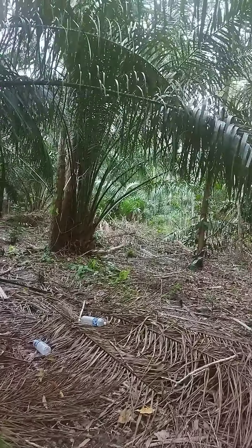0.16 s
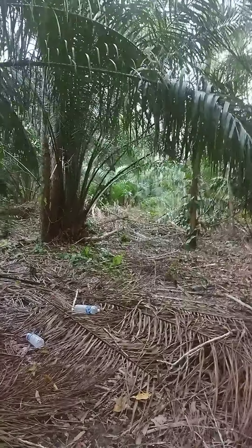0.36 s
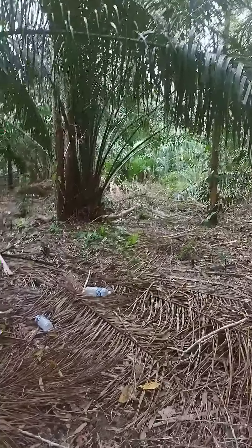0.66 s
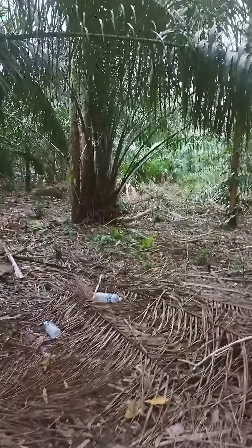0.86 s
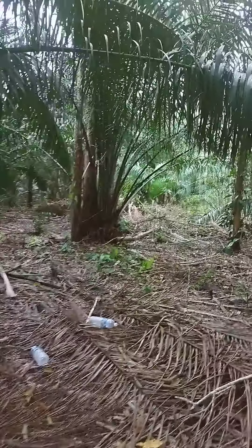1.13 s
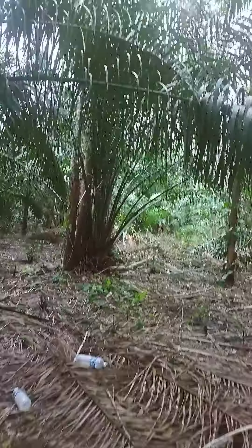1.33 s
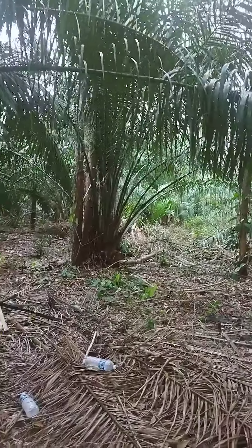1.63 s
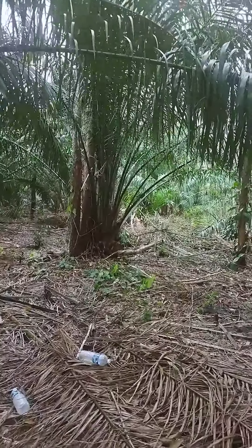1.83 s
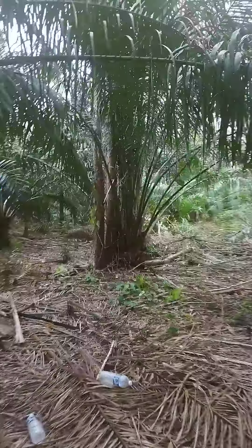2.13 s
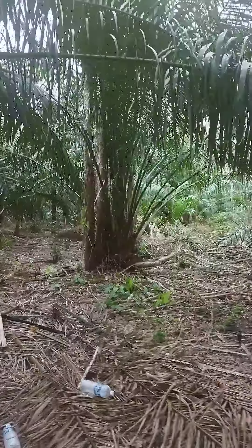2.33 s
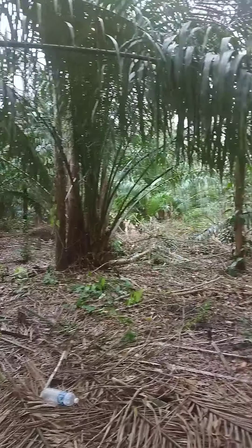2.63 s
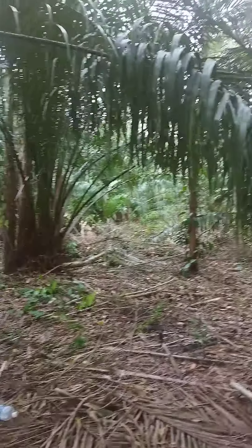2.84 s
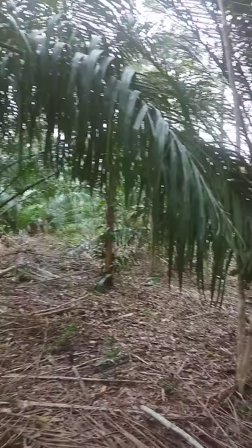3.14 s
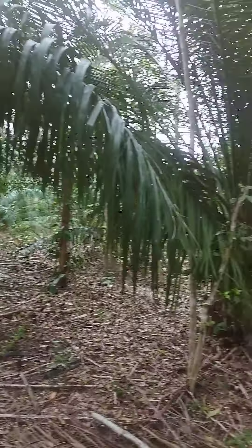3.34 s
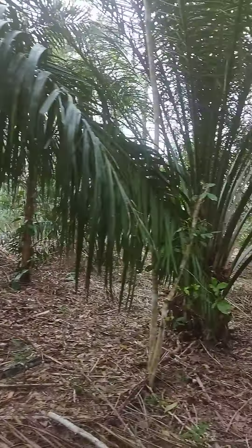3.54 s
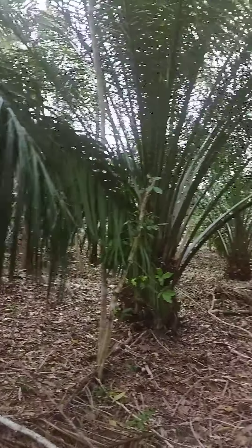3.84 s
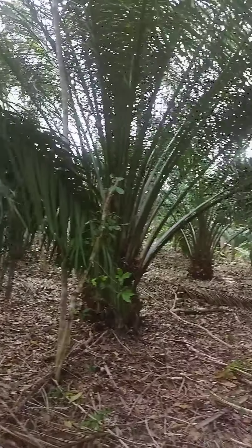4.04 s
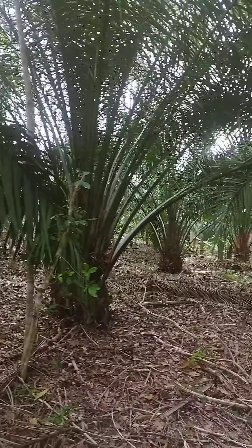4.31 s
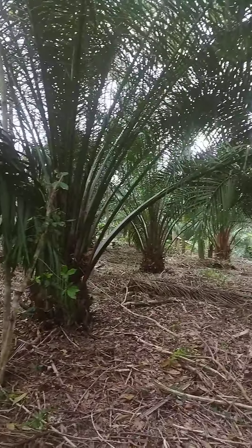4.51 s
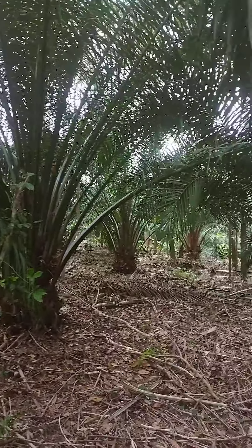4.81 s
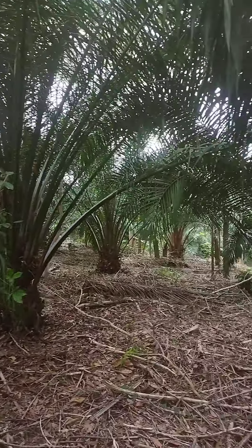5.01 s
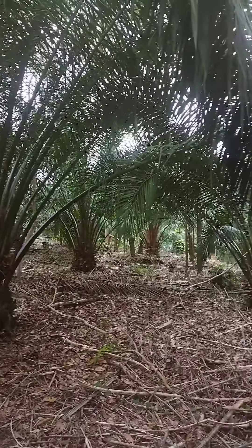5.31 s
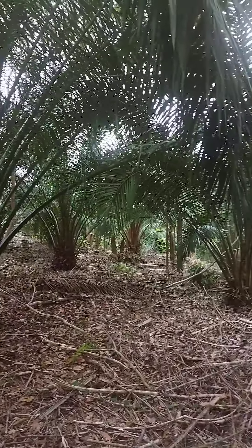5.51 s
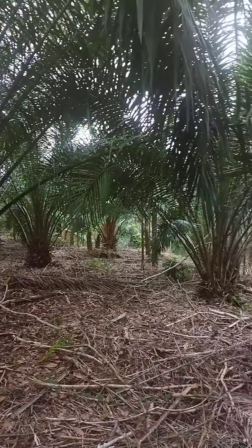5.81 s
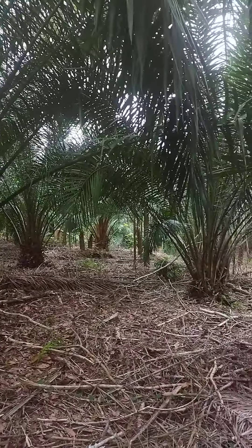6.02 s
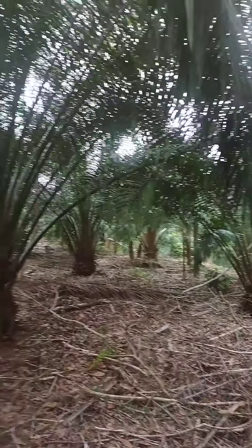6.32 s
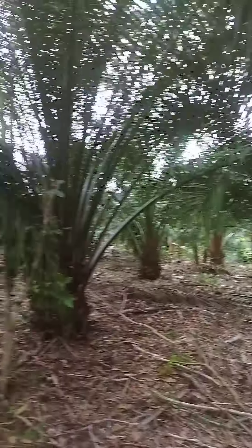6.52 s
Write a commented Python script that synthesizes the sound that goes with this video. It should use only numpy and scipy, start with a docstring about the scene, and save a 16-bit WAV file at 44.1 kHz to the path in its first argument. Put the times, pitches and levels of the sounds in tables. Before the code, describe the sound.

In a quiet palm grove, someone walks over dry leaves and twigs that crackle and snap just below a hand-held microphone. The steps are loudest at first, then soften and nearly stop in the last two seconds. Small gliding bird chirps are scattered in the background. As the steps fade, a faint cricket and far-off chattering birds are heard over a very soft hush and cicada hiss.

```python
"""Footsteps crush dry palm fronds below a hand-held phone: brittle fracture gives a rustle of tiny cracks
and twig snaps, over soft treads and heel thuds. They reach the lower (right) microphone port first.
Bulbuls whistle gliding tones that scatter among the trunks, a dove coos once and a far flock chatters.
Cicadas hiss with their tymbals and a bush cricket rasps with its wings, over the hush of the plantation."""
import sys
import numpy as np
from scipy import signal
from scipy.fft import rfft, irfft, next_fast_len
from scipy.io import wavfile
from scipy.ndimage import uniform_filter1d, map_coordinates

SR = 44100
rng = np.random.default_rng(int(sys.argv[2]) if len(sys.argv) > 2 else 0)


def transcribe(u):
    """Save the signal u as a 16-bit wav file named by the first command-line argument.

    u: samples, shape (n,) or (channels, n), limited to [-1, 1]; the rate is SR.
    q: integer samples, one column per channel.
    """
    v = np.clip(np.atleast_2d(u).T, -1, 1)
    q = np.round(v * 32767).astype(np.int16)
    wavfile.write(sys.argv[1], SR, q)


N = 293706
T = np.arange(N) / SR


# Swells of crackle underfoot, including short bursts around loud snaps. Each row: crest time in seconds,
# crackle level in dB, rise time and 60 dB decay time in seconds, stem and tread offsets in dB.
CRACKLE_SWELLS = [(0.102, -54, 0.12, 0.38, -7, -14), (0.236, -32.5, 0.046, 0.71, -9, -18),
                  (0.357, -29.5, 0.14, .2, -15.5, -24), (0.394, -29.5, .015, 0.28, -20, -22),
                  (0.525, -29.5, 0.37, 0.19, -12, -39), (0.581, -37, 0.055, .62, -13, -44),
                  (1.234, -33, 0.21, 0.26, -12.5, -30), (1.391, -39, 0.52, 0.62, -7.5, -28),
                  (1.991, -39, 0.018, 0.13, 0.5, -11), (2.014, -32.5, 0.021, 0.56, -11.5, -15.5),
                  (2.185, -42.5, 0.35, 0.24, -7.5, -26), (2.378, -28, 0.026, 0.3, -21, -29),
                  (2.863, -39.5, 0.061, 0.46, -7.5, -65), (3.063, -42.5, 0.22, 0.49, -9, -10.5),
                  (3.408, -55.5, 1, 0.92, -5, -5), (3.474, -50.5, .15, 0.2, -7.5, -15),
                  (3.639, -31.5, 0.035, 0.5, -16.5, -21), (3.667, -34.5, 0.077, 0.13, -7, -11.5),
                  (3.771, -48, 0.15, 0.44, -9, -29), (3.873, -48, .4, 0.18, -16, -23.5),
                  (3.963, -47.5, 0.05, 0.36, -18, -11), (4.161, -45.5, .15, 0.15, -9.5, -10),
                  (4.245, -52, 0.2, 0.27, -13.5, -18), (4.364, -58, 0.28, 0.36, -22, -16),
                  (4.917, -62, 0.092, 0.56, -13, -9), (5.085, -49, 0.023, 0.19, -29, -12.5),
                  (5.374, -70, 0.3, .9, -9, -12), (5.946, -65.5, 0.35, 0.24, -3, 0.5),
                  (6.659, -61.5, 0.17, .3, -6, -17)]
# Litter shifting between swells. Each row: time in seconds, crackle, stem and tread levels in dB.
LITTER_SHIFTS = [(0, -58.5, -62, -54), (0.2, -67, -69.5, -63.5), (0.85, -66, -62.5, -59),
                 (1.1, -57, -60, -59.5), (1.67, -62, -62, -56), (1.97, -64.5, -65, -65),
                 (2.3, -50, -55.5, -64.5), (2.56, -64, -61.5, -57.5), (2.83, -56, -59.5, -58.5),
                 (3.3, -55, -60.5, -78), (3.6, -88, -76, -79), (4.1, -72.5, -71, -62.5),
                 (4.7, -71.5, -74.5, -69), (5.9, -78, -78, -72.5), (6.1, -77, -76, -63),
                 (6.66, -75, -72, -72)]

def rustle_gains():
    """Incoherent sources add in power: swells and shifting litter set crackle, stem and tread gains."""
    times, *bed_db = np.transpose(LITTER_SHIFTS)
    power = amp([np.interp(T, times, db) for db in bed_db]) ** 2
    climb_db = 53.5  # over one rise time
    stretch = np.c_[[1, 1.186, 1.24]]  # stems and tread rise and die more slowly than the crackle
    for crest, db, rise_s, t60, stem_db, tread_db in CRACKLE_SWELLS:
        span = slice(max(round((crest - 0.6) * SR), 0), round((crest + 1.2) * SR))
        t = T[span] - crest
        shape_db = np.minimum(climb_db * t / rise_s, -60 * t / t60)
        power[:, span] += amp(db + np.c_[[0, stem_db, tread_db]] + shape_db / stretch) ** 2
    return np.sqrt(power)


def rustle():
    """Shot noise: leaflets crack at random under the sole, each lifting the noise for milliseconds."""
    crackle, stem, tread = rustle_gains()
    sizes_db = np.minimum(1.4 * rng.exponential(size=N), 11)
    cracks_per_s, crack_t60_s = 300, 0.0053
    cracks = (rng.random(N) < cracks_per_s * amp(3 * wobble(20)) / SR) * amp(sizes_db)
    decays = signal.lfilter([1], [1, -amp(-60 / (crack_t60_s * SR))], cracks)
    gate = unit(2.45 + decays)
    soft_gate = unit(uniform_filter1d(gate, size=200))  # the heavy sole follows only the clumps
    return near_ports(litter_colour(low=tread * soft_gate * patchy_noise(2.9),
                                    mid=amp(6) * stem * gate * patchy_noise(4.2),
                                    high=amp(1) * crackle * gate * patchy_noise(4.3)))


# Twig snaps and the quick rebounds that follow the loudest ones. Each row: start in seconds, level in dB,
# crunch offset in dB, crunch pitch in Hz, knock offset in dB, extra crack gain at the left port in dB.
SNAPS_AND_REBOUNDS = [(0.0955, -29, -15, 2680, -40, 5), (0.228, -19.5, -14, 3700, -28, -9),
                      (0.2402, -18, -11, 1780, -40, -6), (0.2467, -20.5, -9, 3970, -47, -9),
                      (0.253, -18, -10.5, 2080, -27, -8), (0.332, -10.5, -14, 1650, -21, -5),
                      (0.3419, -14.5, -13.5, 1840, -41, 6), (0.3814, -5, -20.5, 4450, -28, 1),
                      (0.3913, -14, -13, 4470, -36, -2), (0.5303, -18, -9, 3000, -30, -6),
                      (0.566, -7.5, -15, 3870, -21, 1.5), (0.5834, -13.5, -16, 1890, -51, 5.5),
                      (0.6892, -31.5, -7, 1980, -37, 4), (1.0462, -33, -8.5, 2170, -41, -2),
                      (1.1412, -33.5, -5.5, 2150, -19, -2), (1.2111, -19.5, -13, 4120, -21, -10),
                      (1.2225, -18, -16, 3780, -30, -3), (1.2326, -20, -2.5, 3870, -44, -6),
                      (1.2412, -14.5, -3.5, 3690, -40, -5), (1.3058, -17.5, -15, 2120, -24.5, -4),
                      (1.381, -36, -2, 2290, -14, -12), (1.4357, -16, -25, 2470, -28, -19),
                      (1.9945, -18.5, -9, 4040, -28, 2), (2.0009, -4.5, -15, 3920, -49, 0.5),
                      (2.0109, -12, -10.5, 3700, -40, 0), (2.117, -22.5, -2, 1670, -16, -5),
                      (2.1441, -17, -10.5, 3960, -25, -6), (2.149, -24, -12, 2600, -42, 3),
                      (2.1773, -19, -12, 2380, -33, -3.5), (2.2617, -26, -8.5, 2660, -32, -1),
                      (2.3671, -8.5, -9.5, 2250, -20, 0), (2.4987, -33, -10, 2960, -26, 2),
                      (2.5681, -41, -2, 3300, -22, -3), (2.606, -39, -3, 3300, -22, -5),
                      (2.621, -30, -11, 3070, -15, -6), (2.6475, -36, -18, 2240, -50, -9),
                      (3.0594, -34.5, 1.5, 2780, -7, -8), (3.242, -31.5, -32, 2210, -22, 5),
                      (3.3007, -50.5, 10, 2880, -46, 17), (3.456, -18, -11.5, 1710, -59, -1.5),
                      (3.483, -41.5, 8.5, 1490, -17, 1), (3.6356, -19, -14, 4000, -36, -13),
                      (3.665, -19.5, -27, 4070, -30, -15), (3.6957, -11, -40, 2500, -38, -3),
                      (3.7675, -24.5, -11.5, 4640, -42, -8), (3.7997, -39, 0, 3940, -29, -3),
                      (3.8341, -29.5, -12, 1980, -22, -6), (3.9556, -20, -34, 2070, -38, -7),
                      (4.2354, -25, -11.5, 2620, -39, -5), (4.35, -35, -14.5, 2390, -31, -4),
                      (4.396, -37.5, -18, 2260, -30, -2), (4.584, -44, -12, 2180, -24, -5),
                      (4.6214, -35.5, -9.5, 2230, -29, -2), (4.7361, -53, -3, 2200, -20, -3),
                      (4.8098, -51, -4, 2550, -23, -3), (4.842, -46, -5, 2710, -17, -3),
                      (4.9118, -33.5, -22, 2600, -42, -2), (5.0731, -27.5, -39, 2520, -42, 5.5),
                      (5.372, -42.5, -14, 2360, -21, -3), (5.463, -46, -14, 1440, -21, 1),
                      (5.9408, -46, -16, 2480, -21, -8), (6.249, -47, -7, 2250, -21, 2.5)]

def snaps_and_rebounds():
    """Impulse response: each snap or rebound is a burst of noise with a brief ring of the stem."""
    size = SR // 20
    t = np.arange(size) / SR
    attack = 1 - np.exp(-(t / 0.0012) ** 2)

    def burst(wave, t60):
        return unit(attack * amp(-60 * t / t60) * wave)

    bands = np.zeros((3, 3, N + size))  # knock, crunch, crack; each for the right port and a left pair
    for start, db, crunch_db, crunch_hz, knock_db, left_db in SNAPS_AND_REBOUNDS:
        knock_hz = 757 * np.exp(0.16 * rng.standard_normal())
        noise = rng.standard_normal((3, 2, size))
        knock_ring = 0.39 * np.sin(2 * np.pi * knock_hz * t)
        crunch_ring = 0.45 * np.sin(2 * np.pi * crunch_hz * t)
        knock = amp(db + knock_db - 16) * burst(noise[0] + knock_ring, t60=0.0086)
        crunch = amp(db + crunch_db - 20) * burst(noise[1] + crunch_ring, t60=0.011)
        crack = amp(db - 22) * burst(noise[2], t60=0.0055)
        parts = np.array([knock, crunch, crack])[:, [0, 0, 1]]
        parts[2, 1:] *= amp(left_db)  # the hand and the phone shade the treble
        onset = round(start * SR)
        bands[..., onset:onset + size] += parts
    right, *left_pair = litter_colour(*bands[..., :N])
    left = near_ports(np.array(left_pair))[0]
    return np.array([left, right])


# The litter's spectrum as the ports pass it. Each row: frequency in Hz, relative spectral density in dB.
LITTER_SPECTRUM = [(40, -29.5), (100, -14.5), (300, -10), (900, -7.5), (3000, -5.5), (4300, -6.5),
                   (5050, -14.5), (6400, -5.5), (7300, -14.5), (9500, -3), (10700, -6.5), (11300, -14),
                   (11800, -1.5), (15600, -1.5), (16200, -40)]

def litter_colour(low, mid, high):
    """Source and filter: three excitations drive the tread, stem and leaflet bands of one spectrum."""
    def response(hz, band):
        tread = 1 / (1 + (hz / 800) ** 4)
        leaflet = 1 / (1 + (4800 / (hz + 1)) ** 8)
        stem = np.abs(1 - tread - leaflet)
        return unit(amp(log_curve(LITTER_SPECTRUM, hz)) * np.sqrt([tread, stem, leaflet][band]))
    return sum(filtered(x, lambda hz: response(hz, band)) for band, x in enumerate((low, mid, high)))


# Heels landing on soil. Each row: start in seconds, level in dB, pitch in Hz.
HEEL_STRIKES = [(0.3824, -40.5, 119), (1.1296, -46, 199), (1.3819, -39, 276), (3.0585, -36.5, 318),
                (3.5194, -55.5, 270), (3.667, -49.5, 211), (3.695, -46.5, 200)]

def heel_thuds():
    """Damped oscillation: a heel's impact on soft soil dies within a few low cycles."""
    out, t = np.zeros(N + SR), np.arange(SR // 10) / SR
    rise_s, t60 = 0.0024, 0.031
    for start, db, hz in HEEL_STRIKES:
        envelope = amp(db + 5.5 - 60 * t / t60) * (1 - np.exp(-t / rise_s))
        out[round(start * SR):][:len(t)] += envelope * np.sin(2 * np.pi * hz * t)
    return near_ports(np.array([out[:N], out[:N]]))


# Likeness of the two ports for sounds underfoot. Each row: frequency in Hz, correlation from 0 to 1.
NEAR_COHERENCE = [(50, 0.13), (130, 0.43), (300, 1), (1000, 0.7), (3000, 0.26), (8000, 0.11),
                  (15000, 0.033)]
# Shading of sounds underfoot. Each row: frequency in Hz, left port gain in dB.
NEAR_SHADING = [(60, -3.5), (300, 0), (800, -4), (2500, -3.5), (7500, -2.5), (8500, 0), (12000, -5),
                (16000, -8.5)]

def near_ports(pair):
    """Path difference: sound from the ground reaches the upper (left) port later and shaded."""
    return ports(pair, NEAR_COHERENCE, NEAR_SHADING, lag_s=21 / SR)


# Bulbul notes. Each row: start in seconds, length in seconds, turning point as a share of the length,
# pitch at the start, turn and end in Hz, level in dB.
BULBUL_NOTES = [(0.02, 0.081, 0.27, 2740, 2830, 2644, -57.5), (0.78, 0.059, 0.5, 2750, 2080, 2000, -50),
                (0.815, 0.19, 0.79, 2830, 3330, 3330, -53), (1.165, 0.082, .4, 2200, 2470, 2430, -48),
                (1.27, 0.066, .5, 2150, 2000, 2200, -54), (1.33, .11, 0.69, 2255, 2366, 2300, -48.5),
                (1.6, 0.095, 0.51, 3500, 3260, 3200, -56), (1.65, 0.053, 0.3, 1770, 1783, 1330, -50),
                (1.77, 0.088, 0.66, 2530, 3300, 3250, -55), (1.838, 0.089, 0.21, 2700, 2270, 2266, -48.5),
                (2.055, 0.069, 0.56, 2700, 3223, 3140, -40.5),
                (2.145, 0.076, 0.59, 2875, 2007, 1557, -49.5), (2.262, 0.052, .3, 2620, 2480, 2019, -52),
                (2.425, .078, 0.27, 2705, 2642, 3176, -33), (2.535, 0.073, 0.55, 2630, 2174, 1880, -43.5),
                (2.72, 0.081, 0.6, 2639, 2104, 1920, -47.5), (3.06, 0.039, 0.41, 2551, 2790, 2960, -53),
                (3.235, 0.064, .45, 2100, 2800, 2830, -52.5), (3.85, 0.24, 0.6, 1944, 2030, 1840, -64.5),
                (4.545, 0.083, 0.28, 1999, 2300, 2288, -55), (4.76, .11, 0.38, 2693, 2702, 1807, -52),
                (5.27, 0.087, .3, 2220, 2260, 2430, -67), (6.43, 0.098, .55, 1570, 1646, 1290, -64),
                (6.45, 0.12, 0.135, 3120, 3070, 2760, -63.5), (6.62, 0.051, 0.63, 4220, 4740, 4620, -69)]

def bulbuls():
    """Direct and reverberant sound: whistles arrive with their echoes, at the left port first."""
    song = gliding_notes(BULBUL_NOTES, fade_s=0.02, waver=0.01, flutter_db=3.5)
    pair = amp(4) * song + trunk_echoes(song, t60=0.45, wet_db=0.5)
    return ports(pair, coherence=[(2500, 0.11)], shading=[(2500, -8)], lag_s=-12 / SR)


# The dove's one note. Its row has the same columns as a bulbul note.
DOVE_NOTE = [(5.36, 0.52, 0.605, 655, 685, 640, -77.5)]
# Shading of distant sounds. Each row: frequency in Hz, left port gain in dB.
FAR_SHADING = [(100, .5), (700, -0.5), (2400, -5.5), (4400, 5), (9000, -5), (14000, 17)]

def dove_and_flock():
    """Superposition: a low, wavering coo and its echoes add to the chatter of the far flock."""
    coo = gliding_notes(DOVE_NOTE, fade_s=0.043, waver=0.051, flutter_db=5)
    pair = flock() + coo + trunk_echoes(coo, t60=0.35, wet_db=-2)
    return ports(pair, coherence=[(700, 0.73), (2300, 0.41)], shading=FAR_SHADING, lag_s=-3 / SR)


def gliding_notes(notes, fade_s, waver, flutter_db):
    """Frequency modulation: each note is a sine gliding through a turn, unsteady in pitch and strength."""
    out = np.zeros(N)
    bend = 1 + waver * wobble(80)
    flutter = amp(flutter_db * wobble(60))
    for start, length, turn, *pitches_hz, db in notes:
        end = start + length
        span = slice(round((start - fade_s) * SR), round((end + fade_s) * SR))
        progress = (T[span] - start) / length
        fade = np.clip(np.minimum(T[span] - start, end - T[span]) / fade_s + 0.5, 0, 1)
        swell_db = np.interp(progress, [0, 0.58, 1], [-5, 0, -9.5])
        hz = np.interp(progress, [0, turn, 1], pitches_hz) * bend[span]
        phase = 2 * np.pi * np.cumsum(hz) / SR
        out[span] += np.sqrt(2) * fade * amp(db + swell_db) * np.sin(phase)
    return out * flutter


def trunk_echoes(x, t60, wet_db):
    """Scattering: trunks return two decaying echo tails, and moving leaves blur their pitch."""
    t = np.arange(SR // 2) / SR
    tails = rng.standard_normal((2, len(t))) * amp(-60 * t / t60)
    leaves = unit(np.array([wobble(150), wobble(150)]))
    echoes = signal.fftconvolve(x[None], tails / np.linalg.norm(tails[0]), axes=1)[:, :N]
    return amp(wet_db) * leaves * echoes


def flock():
    """Narrow-band noise: many short notes overlap into a chatter that surges and slowly fades."""
    start_s, crest_s, surge_hz, fade_db_per_s = 5.79, 5.91, 5.4, 5
    surge_db = 2.5 * np.cos(2 * np.pi * surge_hz * (T - crest_s))
    level_db = -57.5 + surge_db - fade_db_per_s * (T - start_s)
    onset = np.clip((T - start_s) / 0.013, 0, 1)
    notes = patchy_noise(3.5) * amp(2 * wobble(45))
    chatter = unit(filtered(notes, lambda hz: resonance(hz, 2290, 670) ** 2))
    return chatter * amp(level_db) * onset


# The cicadas' slow swell. Each row: time in seconds, level in dB.
CICADA_LEVELS = [(0.0, -74), (6.66, -67.5)]

def cicadas():
    """Resonance: fast tymbal clicks blur into a high hiss that pulses at the click rate."""
    times, db = np.transpose(CICADA_LEVELS)
    click_hz = 235 + 25 * wobble(4.3)
    buzz = 1 + 0.13 * np.sin(2 * np.pi * np.cumsum(click_hz) / SR)
    tymbals = lambda hz: resonance(hz, 9160, 1134) * resonance(hz, 9500, 1100)
    return unit(filtered(patchy_noise(1.9) * buzz, tymbals)) * amp(np.interp(T, times, db))


# The cricket's rasps. Each row: start in seconds, level in dB.
CRICKET_RASPS = [(4.155, -66), (4.73, -71), (5.285, -69), (5.872, -68.5), (6.455, -68.5)]

def bush_cricket():
    """Stridulation: bursts of scraping strokes excite a narrow resonance of the wings."""
    rise_s, t60, stroke_hz = 0.0073, 1, 107
    bursts = sum(amp(db - 60 * np.abs(T - start) / t60) * np.clip((T - start) / rise_s, 0, 1)
                 for start, db in CRICKET_RASPS)
    strokes = 1 + 0.26 * np.sin(2 * np.pi * stroke_hz * T)
    return bursts * unit(filtered(patchy_noise(4.6) * strokes, lambda hz: resonance(hz, 6650, 470)))


# The hush of leaves and distance. Each row: frequency in Hz, relative spectral density in dB.
HUSH_SPECTRUM = [(18, -72), (30, -21), (93, -0.5), (280, -2), (374, -6.5), (499, -11.5), (1100, -8),
                 (2410, -6), (2680, -7.5), (2900, -17), (4650, -21), (6720, -22), (8980, -36), (16000, -43)]
# Likeness of the two ports for the hush. Each row: frequency in Hz, correlation from 0 to 1.
HUSH_COHERENCE = [(60, 0.2), (300, 0.4), (640, 1), (1400, 0.57), (4000, 0.032)]

def plantation_hush():
    """Ambient noise: leaves and distant sounds merge into a broad, nearly steady spectrum."""
    hush = unit(filtered(patchy_noise(0.62), lambda hz: amp(log_curve(HUSH_SPECTRUM, hz))))
    level_db = -66.5 + 0.64 * wobble(3.3)
    return ports(amp(level_db) * hush, HUSH_COHERENCE, FAR_SHADING, lag_s=0)


def ports(pair, coherence, shading, lag_s):
    """Partial coherence: the right port hears the first signal, the left a shifted, shaded mix of both."""
    def blend(hz):
        shared = log_curve(coherence, hz)
        delay = np.exp(-2j * np.pi * hz * lag_s)
        return amp(log_curve(shading, hz)) * delay * [shared, np.sqrt(1 - shared ** 2)]
    return np.array([filtered(pair, blend).sum(axis=0), pair[0]])


def patchy_noise(depth_db):
    """Comodulation: two independent noises share patches of random gain in time and frequency."""
    spectra = signal.stft(rng.standard_normal((2, N)), nperseg=256)[2]
    patches = uniform_filter1d(rng.standard_normal(spectra.shape[1:]), 4, axis=0)
    patches = unit(uniform_filter1d(patches, 8, axis=1))
    noise = signal.istft(spectra * amp(depth_db * patches), nperseg=256)[1]
    return unit(noise[:, :N])


def resonance(hz, centre_hz, width_hz):
    """Cascaded resonators: the response of two equal band-passes in a row."""
    return (1j * hz * width_hz / (centre_hz ** 2 - hz ** 2 + 1j * hz * width_hz)) ** 2


def filtered(x, response):
    """Linear filtering: the spectrum of x is multiplied by a complex response of frequency."""
    size = next_fast_len(N + 8192)
    return irfft(rfft(x, size) * response(np.fft.rfftfreq(size, 1 / SR)), size)[..., :N]


def wobble(knots_per_s):
    """Random modulation: a smooth spline through Gaussian knots."""
    return map_coordinates(rng.standard_normal(int(N * knots_per_s / SR) + 4), [T * knots_per_s])


def log_curve(points, hz):
    """Interpolation of (Hz, value) points on a logarithmic frequency axis."""
    knots_hz, values = np.transpose(points)
    return np.interp(np.log(hz + 1), np.log(knots_hz + 1), values)


def unit(x):
    """Normalisation to an rms of 1."""
    return x / np.sqrt(np.mean(x ** 2) + 1e-20)


def amp(db):
    """Amplitude ratio of a level in decibels."""
    return 10 ** (np.asarray(db) / 20)


def scene():
    """Superposition: all sources add at the left and right ports."""
    footsteps = rustle() + snaps_and_rebounds() + heel_thuds()
    return footsteps + bulbuls() + dove_and_flock() + cicadas() + bush_cricket() + plantation_hush()


def record(dry):
    """Band limiting: the phone keeps nothing above its cutoff frequency."""
    return filtered(dry, lambda hz: hz < 17140)


dry = scene()
out = record(dry)
transcribe(out)
```